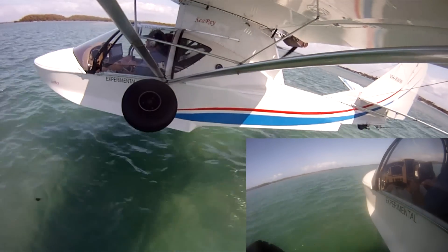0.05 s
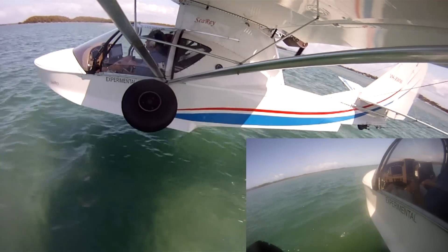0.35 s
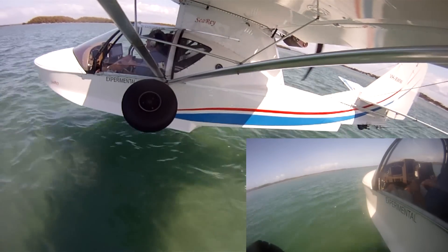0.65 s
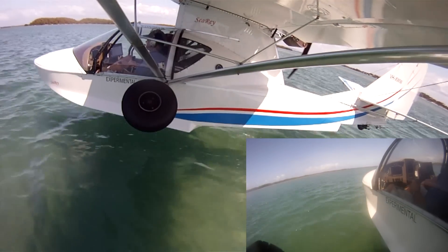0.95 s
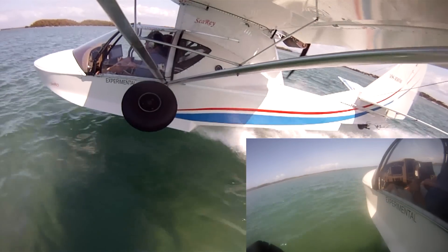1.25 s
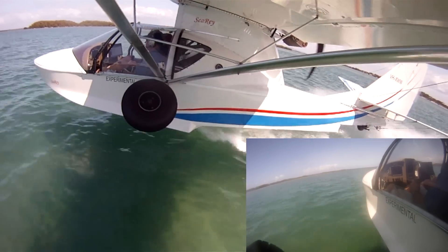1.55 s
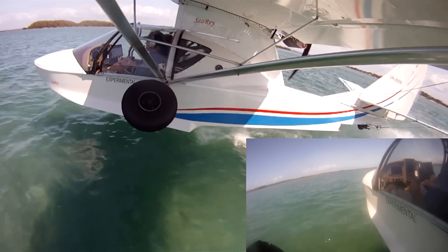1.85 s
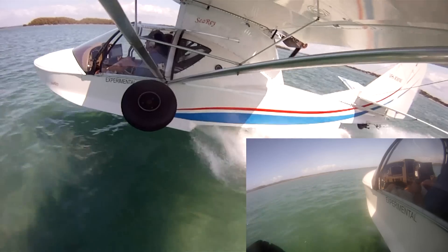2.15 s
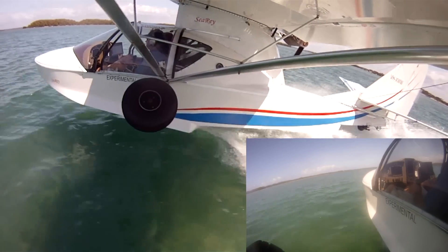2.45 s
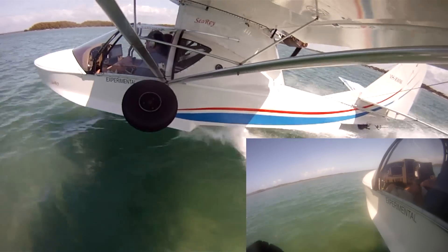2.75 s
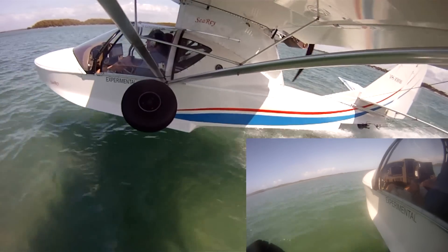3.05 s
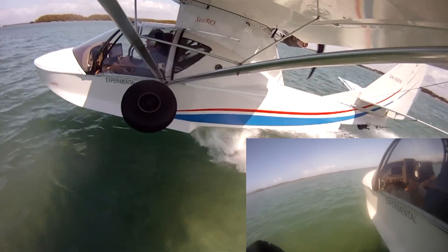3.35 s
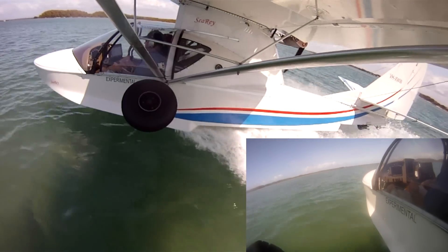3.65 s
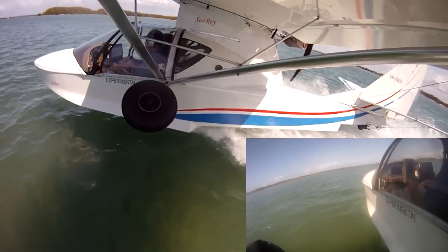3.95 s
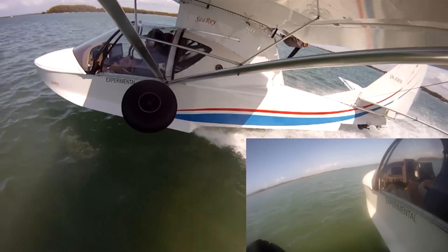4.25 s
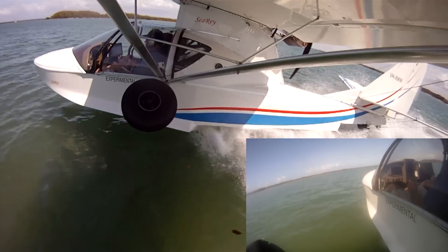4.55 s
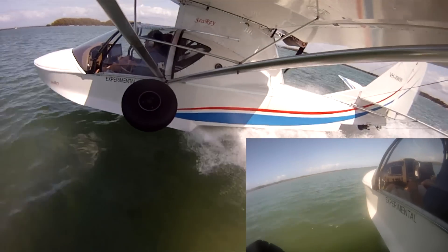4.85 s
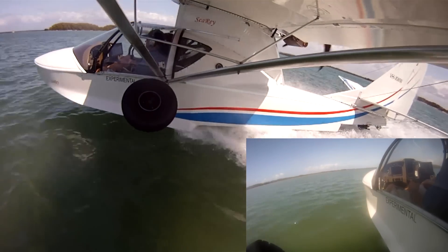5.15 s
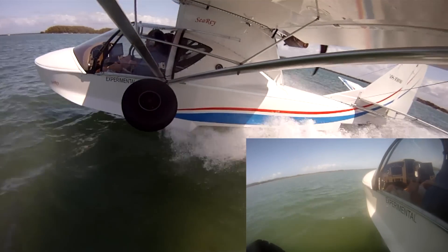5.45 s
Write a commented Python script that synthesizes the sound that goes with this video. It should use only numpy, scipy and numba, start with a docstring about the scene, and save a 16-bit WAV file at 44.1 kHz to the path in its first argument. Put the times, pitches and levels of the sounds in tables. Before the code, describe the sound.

A light flying boat lands on choppy water, rushing air giving way to hull thumps, sharp splashes and a low rumble.

```python
"""A small flying boat settles on choppy water, heard from inside a plastic housing on its wing strut.
In flight, turbulent air roars and vortex shedding makes a strut and a wire sing over the airframe's rumble.
After touchdown the hull's ploughing modulates the wake, the rumble and the wing modes, and dry ticks set in.
Impacts of waves and spray excite hull and housing; the hardest make a gain control duck.
Sample and hold at a low rate mirrors the midrange into a gritty treble."""
import sys
import numpy as np
from scipy import signal
from scipy.fft import rfft, irfft
from scipy.io import wavfile
from scipy.ndimage import minimum_filter1d, map_coordinates
from numba import njit

SR = 44100
rng = np.random.default_rng(int(sys.argv[2]) if len(sys.argv) > 2 else 0)


def put_to_file(sound):
    """Save the sound as 16-bit audio at rate SR, in the file named by the first command-line argument."""
    columns = np.atleast_2d(sound).T  # one column per channel
    safe = np.clip(columns, -1, 1)
    whole_steps = np.round(safe * 32767)
    wavfile.write(sys.argv[1], SR, whole_steps.astype(np.int16))


N = 247842
TOUCHDOWN_S = 1.316

# resonances and notches of the housing: (frequency [Hz], width [Hz], gain [dB])
HOUSING_RESONANCES = [(547.4, 44, 12), (647, 50, -7.5), (751.6, 145, 14.5), (847, 111, 8.5),
                      (1189, 194, 14), (1890, 170, 4.5), (2069, 146, 13), (2402, 236, 12), (2880, 80, -1),
                      (2822, 164, 7), (3310, 110, 4), (3673, 138, 11)]
# spectrum with which wake and clatter drive the housing: (frequency [Hz], level [dB])
WASH_SPECTRUM = [(250, -8), (450, -0.5), (1000, -2), (1700, 3), (3200, -3), (4300, -2.5), (5200, -5),
                 (5900, -18)]
# rush of the wake, swelling as the hull ploughs deeper: (time [s], level [dB])
WAKE_LEVELS = [(1.35, -37), (2.1, -43.5), (2.38, -35), (2.47, -42.5), (2.73, -37.5), (2.85, -45.5),
               (3.02, -42), (3.12, -40), (3.25, -36.5), (3.5, -35.5), (3.62, -42), (4.04, -35),
               (4.16, -38.5), (4.65, -44), (5.12, -35.5), (5.21, -43), (5.33, -40.5), (5.62, -43)]


def amp(db):
    """Decibels to amplitude ratio."""
    return 10 ** (np.asarray(db) / 20)


def unit(x):
    """Normalise to rms 1."""
    return x / np.sqrt(np.mean(x ** 2) + 1e-20)


def envelope(rows):
    """Linear interpolation of (time, level) rows at every sample."""
    return np.interp(np.arange(N) / SR, *np.transpose(rows))


def wobble(rate):
    """Smooth random modulation with rate knots a second."""
    return map_coordinates(rng.standard_normal(4096), [np.arange(N) * rate / SR], mode="wrap")


def response(spectrum, resonances=(), size=8192):
    """Minimum-phase impulse response of a spectrum with resonances added in dB."""
    hz = np.fft.rfftfreq(size, 1 / SR)
    knot_hz, knot_db = np.transpose(spectrum)
    db = np.interp(np.log(hz + 1), np.log(knot_hz), knot_db)
    for centre, width, lift in resonances:
        db = db + lift / (1 + (2 * (hz - centre) / width) ** 2)
    cepstrum = irfft(np.log(amp(db)))
    cepstrum[1:size // 2] *= 2
    cepstrum[size // 2 + 1:] = 0
    return irfft(np.exp(rfft(cepstrum)))


def through(x, impulse):
    """Linear filtering by convolution."""
    return signal.fftconvolve(x, impulse)[:len(x)]


def noise(impulse):
    """Stationary filtered noise of rms 1."""
    return unit(signal.fftconvolve(rng.standard_normal(N + len(impulse) - 1), impulse, "valid"))


def tone(hz):
    """A sine of rms 1 whose phase is the integral of frequency."""
    return np.sqrt(2) * np.sin(2 * np.pi * np.cumsum(hz) / SR)


def burst(impulse, rise, t60):
    """Response of a body to a decaying random force; times in s, peak near 1."""
    t = np.arange(SR // 3) / SR
    force = (1 - np.exp(-t / rise)) * amp(-60 * t / t60)
    ring = through(rng.standard_normal(len(t)) * force, impulse)
    return ring * np.linalg.norm(force) / np.linalg.norm(ring) / (2 * force.max())


def add(track, onset_s, sound):
    """Superpose a sound on the track."""
    part = track[max(round(onset_s * SR), 0):][:len(sound)]
    part += sound[:len(part)]


def since_touchdown():
    """Seconds since the keel's first contact, negative in flight."""
    return np.arange(N) / SR - TOUCHDOWN_S


def airborne():
    """1 in flight, falling to 0 just after contact."""
    return np.interp(since_touchdown(), [.002, .008], [1, 0])


def air_or_water(air_db, water_db):
    """Crossfade from the level in flight to the level afloat."""
    return water_db + (air_db - water_db) * airborne()


def ploughing():
    """How much harder than usual the hull cuts the water, in dB; 0 in flight."""
    return (envelope(WAKE_LEVELS) - np.mean(WAKE_LEVELS, axis=0)[1]) * (1 - airborne())


def wind():
    """Turbulence excites the housing; a wire's aeolian tone falls with the airspeed."""
    # airflow over the housing: (time [s], level [dB])
    airflow = [(0.0, -24), (0.314, -20.5), (0.986, -26.5), (1.26, -25.5)]
    # spectrum of the turbulence: (frequency [Hz], level [dB])
    air_spectrum = [(250, 6), (450, -6.5), (1000, -2.5), (1700, 2.5), (3200, -2), (4300, 1), (5200, -3),
                    (5900, -14)]
    air_db = envelope(airflow)
    rush = noise(response(air_spectrum, HOUSING_RESONANCES)) * amp(air_db - 0.5 + 1.7 * wobble(45.5))
    wire_hz = 2015 - 170 * np.arange(N) / SR
    wire_db = -35.5 + 2.1 * (air_db - np.mean(airflow, axis=0)[1])  # swings wider than the airflow
    wire = tone(wire_hz + 55 * wobble(300)) * amp(wire_db + 6.1 * wobble(120))
    return (rush + wire) * airborne()


def strut():
    """Vortex shedding gives a tone that swells, holds until touchdown, then drops and fades."""
    swell_db_per_s, hold_s, drop_db, fade_db_per_s = 11, 0.23, 12, 7.5
    t = since_touchdown()
    swell_db = swell_db_per_s * np.minimum(t + hold_s, 0)
    level_db = -18.3 + air_or_water(swell_db, -drop_db - fade_db_per_s * t)
    return tone(hz=194.9 + 2.8 * wobble(40)) * amp(level_db + 1.8 * wobble(25))


def wing():
    """The wing shudders in two bending modes; ploughing favours the upper one."""
    # modes: (frequency [Hz], level in flight [dB], level afloat [dB], growth with ploughing [dB/dB])
    bending_modes = [(43.2, -24.5, -19.5, -0.7), (50.1, -26.5, -30, 1.35)]
    shudder = np.zeros(N)
    for hz, air_db, water_db, growth in bending_modes:
        level_db = air_or_water(air_db, water_db) + growth * ploughing()
        shudder += tone(hz + 0.84 * wobble(10)) * amp(level_db + 1.2 * wobble(16))
    return shudder


def airframe():
    """Forced random vibration of struts and skin: a rumble that grows with ploughing."""
    # response of the airframe: (frequency [Hz], level [dB])
    frame_spectrum = [(18, -5), (30, -3), (45, -1), (62, -1.5), (82, 6.5), (103, -9), (135, 1.5),
                      (165, -6.5), (200, -4), (230, -9), (280, -4), (350, -18), (450, -33), (700, -34)]
    level_db = air_or_water(-19, -21.5) + 0.78 * ploughing()
    return noise(response(frame_spectrum + [(3000, -100)])) * amp(level_db + 1.03 * wobble(24))


def splashes():
    """Impact excitation: splashes crack on the housing and knock it with their bulk, amid droplets."""
    # splashes: (time [s], level [dB], relative knock level [dB])
    strikes = [(1.140, -7, -26), (1.290, -13.5, 1.5), (1.368, -17, -12), (1.419, -2.5, -12.5),
               (1.459, -9, -12), (1.792, -14.5, -27), (1.960, -15, -10), (2.044, -23, 0.5),
               (2.394, -7, -18), (2.457, -13.5, -32), (2.675, -9.5, -27), (2.906, -16, -12),
               (3.031, -1.5, -25), (3.093, -9, -21), (3.311, -28, -9), (3.681, -11.5, -18),
               (3.767, -5, -20), (3.785, -7, -14), (3.909, -11, -17), (4.073, 6.5, -11.5), (4.149, 1, -10),
               (4.328, -4.5, -11), (4.658, -7, -10.5), (4.766, -13.5, -13), (4.889, -9.5, -25),
               (5.078, -7, -14), (5.127, -10, -6.5), (5.462, -16.5, -23), (5.493, -15.5, -5)]
    # one solid slug of water: (time [s], level [dB], relative knock level [dB])
    slug = (1.5293, 15.4, 1.7)
    # spectrum of the sharp crack: (frequency [Hz], level [dB])
    crack_spectrum = [(400, -37), (1200, -14), (1700, -6.5), (2200, 4), (2900, 3), (3600, -10), (5000, -14),
                      (5900, -29)]
    # spectrum of the dull knock: (frequency [Hz], level [dB])
    knock_spectrum = [(300, -28), (750, -15), (1200, 6), (1600, -1.5), (2200, 2.5), (5000, -36.5)]
    crack = response(crack_spectrum, HOUSING_RESONANCES)
    knock = response(knock_spectrum, HOUSING_RESONANCES)
    track = np.zeros(N)
    for onset, db, knock_db in strikes:
        add(track, onset, amp(db - 0.5) * burst(crack, rise=0.0018, t60=0.015))
        add(track, onset, amp(db + knock_db + 2.5) * burst(knock, rise=0.0029, t60=0.039))
        add(track, onset - .002, amp(db - 15.5) * burst(crack, rise=0.046, t60=0.073))  # droplets
    onset, db, knock_db = slug
    add(track, onset, amp(db) * burst(crack, rise=0.0003, t60=0.019))
    add(track, onset, amp(db + knock_db) * burst(knock, rise=0.00023, t60=0.0077))
    return track


def hull():
    """Damped vibration: waves boom in the hull and shake the housing; the keel lands with one jolt."""
    # wave impacts: (time [s], level [dB], relative clatter level [dB])
    waves = [(1.289, -14.5, -2.5), (1.829, -5.5, -13), (2.15, -6, -17), (2.475, -9, -22), (2.53, -9.5, -13),
             (2.692, -8.5, -14.5), (3.032, -7, -14.5), (3.209, -18, -1.5), (3.308, -10.5, -6.5),
             (3.466, -4.5, -15.5), (3.719, -10.5, -20), (4.244, -8, -20), (4.552, -9.5, -14.5),
             (4.657, -6, -34), (4.86, -11.5, -14), (4.921, -7.5, -13.5), (5.109, -6, -22),
             (5.303, -9.5, -24), (5.403, -8.5, -13), (5.57, -12, -10.5)]
    # response of the hull: (frequency [Hz], level [dB])
    hull_spectrum = [(30, -12.5), (70, 5.5), (140, -2.5), (290, 0), (370, -13), (470, -28), (900, -25.5),
                     (2000, -66)]
    # the keel's jolt: (level [dB], frequency [Hz])
    keel = (-0.071, 114)
    boom, clatter = response(hull_spectrum), response(WASH_SPECTRUM, HOUSING_RESONANCES)
    track = np.zeros(N)
    for onset, db, clatter_db in waves:
        add(track, onset, amp(db - 1.0) * burst(boom, rise=0.0057, t60=0.086))
        add(track, onset, amp(db + clatter_db + 3.0) * burst(clatter, rise=0.0045, t60=0.077))
    db, hz = keel
    t = np.arange(SR // 10) / SR
    add(track, TOUCHDOWN_S, -amp(db) * np.sin(2 * np.pi * hz * t) * amp(-60 * t / 0.036))
    return track


def ticks():
    """A jittered pulse train: dry, uneven high ticks, louder as the rush of the wake swells."""
    # spectrum of a tick: (frequency [Hz], level [dB])
    tick_spectrum = [(800, -60), (2500, 4), (3600, 11.5), (4300, 8), (5200, 14), (5900, 0), (6800, -12)]
    mean_rate_hz, jitter_s, tick_t60_s, fade_db_per_s = 96, .0012, .006, 0.97
    tick_rate_hz = mean_rate_hz * (1 + .07 * wobble(8))
    tick_samples = np.flatnonzero(np.diff(np.floor(np.cumsum(tick_rate_hz) / SR)))
    strength, timing = rng.standard_normal((len(tick_samples), 2)).T
    onsets = np.clip((tick_samples + jitter_s * SR * timing).astype(int), 0, N - 1)
    pulses = np.bincount(onsets, amp(6 * np.minimum(strength, .3)), N)
    decay = amp(-60 * np.arange(SR // 50) / SR / tick_t60_s)
    grit = through(pulses, decay) * rng.choice([-1, 1], N)
    level_db = -38 - fade_db_per_s * since_touchdown() + 1.06 * ploughing()
    return unit(through(grit, response(tick_spectrum))) * amp(level_db) * (1 - airborne())


def wake():
    """Churning water radiates broadband noise, filtered by the housing's resonances."""
    level_db = envelope(WAKE_LEVELS) + 5.5 + 1.7 * wobble(45)
    return noise(response(WASH_SPECTRUM, HOUSING_RESONANCES)) * amp(level_db) * (1 - airborne())


def spray():
    """Shot noise: clumps of drops hit the housing at random, and their powers add."""
    # spectrum of the drops: (frequency [Hz], level [dB])
    drop_spectrum = [(300, -39), (800, -10), (1500, -9), (2100, 3.5), (2850, 2.5), (3400, -5.5), (5000, -5),
                     (5900, -30)]
    clumps_per_s = 120
    arrivals = rng.random(N) < clumps_per_s / SR
    clumps = arrivals * amp(8.3 * np.minimum(rng.standard_normal(N), 1.5))
    t = np.arange(SR // 20) / SR
    clump_power = t ** 2 * amp(-60 * t / 0.022)  # swells and drains away
    splats = np.sqrt(np.abs(through(clumps ** 2, clump_power))) * rng.standard_normal(N)
    patter = unit(through(splats, response(drop_spectrum, HOUSING_RESONANCES)))
    return patter * amp(-32.5 + 0.17 * ploughing()) * (1 - airborne())


def scene():
    """Superposition of all sources at one microphone inside the housing."""
    mono = wind() + strut() + wing() + airframe() + ticks() + wake() + spray() + splashes() + hull()
    return np.array([mono, mono])


@njit
def ducking(excess_db, attack_s, recovery_s):
    """Gain reduction in dB: a first-order lag chases each overload, then relaxes."""
    cut_db, now = np.zeros(len(excess_db)), 0.
    for i in range(len(excess_db)):
        lag_s = attack_s if excess_db[i] > now else recovery_s
        now += (excess_db[i] - now) / (lag_s * SR)
        cut_db[i] = now
    return cut_db


def sample_and_hold(x, hold_hz):
    """Spectral imaging: the band under half the hold rate is mirrored about that rate, with sinc droop."""
    hz = np.fft.rfftfreq(N, 1 / SR)
    baseband = irfft(rfft(x) / np.sqrt(1 + (hz / (hold_hz / 2)) ** 40), N)
    mirrored = baseband * (1 + 2 * np.cos(2 * np.pi * hold_hz * np.arange(N) / SR))
    return irfft(rfft(mirrored) * np.sinc(hz / hold_hz), N)


def record(dry):
    """Gain control lags overloads, so first cycles clip; sample and hold and a steep low-pass follow."""
    headroom, cutoff_hz = 1.3, 15600
    peak = -minimum_filter1d(-np.abs(dry[0]), size=265, origin=132)  # over the past 6 ms
    excess_db = np.maximum(20 * np.log10(peak + 1e-9) + .5, 0)
    cut_db = ducking(excess_db, attack_s=0.0033, recovery_s=.105)
    preamp = np.clip(dry * amp(-cut_db), -headroom, headroom)
    held = np.clip(sample_and_hold(preamp, hold_hz=12000), -1, 1)
    return irfft(rfft(held) * (np.fft.rfftfreq(N, 1 / SR) < cutoff_hz), N)


dry = scene()
out = record(dry)
put_to_file(out)
```